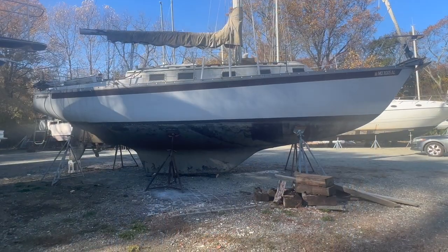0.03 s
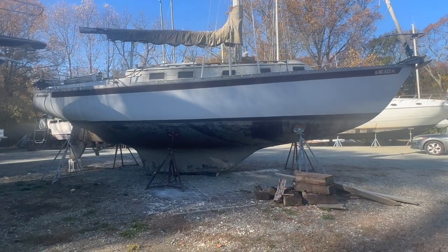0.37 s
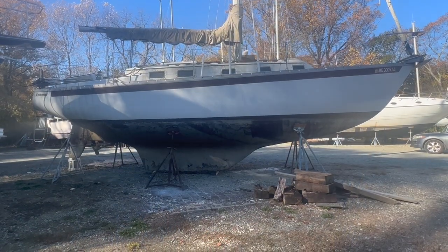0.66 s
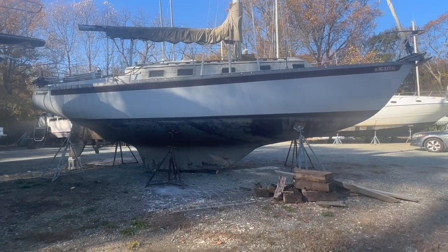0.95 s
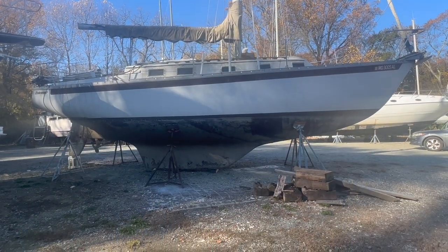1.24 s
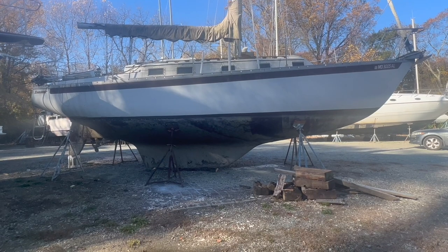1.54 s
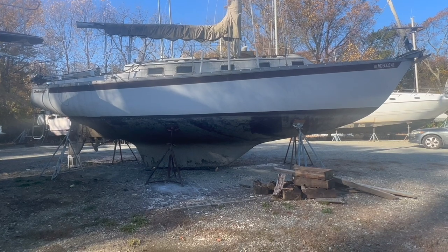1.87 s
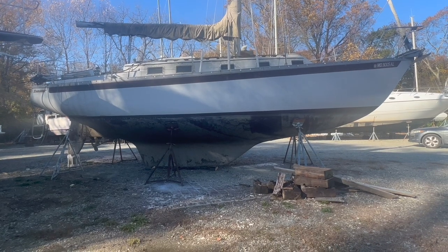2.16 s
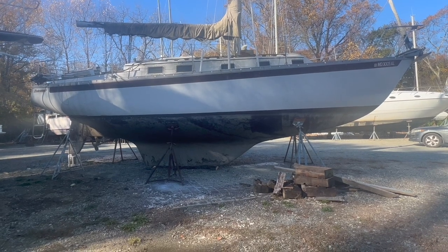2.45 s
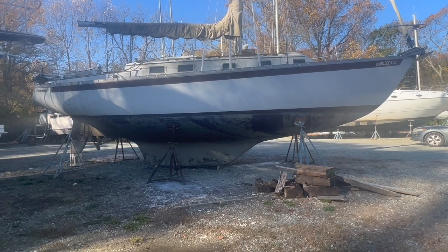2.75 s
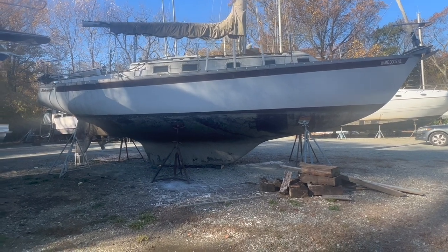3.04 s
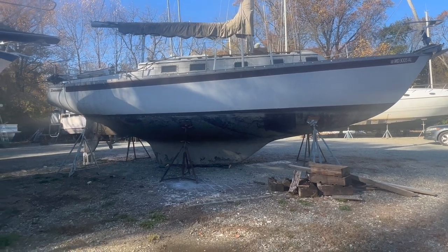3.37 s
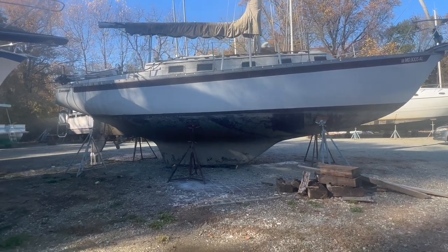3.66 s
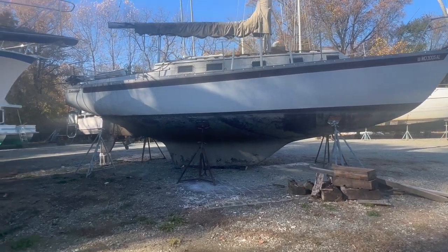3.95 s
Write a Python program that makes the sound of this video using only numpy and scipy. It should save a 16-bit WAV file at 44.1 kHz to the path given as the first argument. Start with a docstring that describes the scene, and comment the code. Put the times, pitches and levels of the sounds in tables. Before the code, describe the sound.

Several small birds call outdoors, first in repeated phrases ending in rising trills, later in three held, wavering whistles. Faint chatter and far gull yelps mix in, echoing lightly, while wind and distant traffic rumble softly at the microphone.

```python
"""Songbirds sing in the trees round a boatyard, each voice a sliding, nearly pure tone.
One repeats a phrase of arched notes and a rising trill, then come level, quivering whistles.
Others slur, peep, rasp and chatter in between, and a far gull yelps four times.
Hulls and trees scatter the calls over a low, steady rumble of wind and distant traffic."""
import sys
import numpy as np
from scipy import signal
from scipy.fft import rfft, irfft
from scipy.io import wavfile
from scipy.ndimage import uniform_filter1d

SR = 44100
rng = np.random.default_rng(int(sys.argv[2]) if len(sys.argv) > 2 else 0)


def log_audio(samples):
    """Write samples as a 16-bit WAV file to the path given in sys.argv[1]."""
    # one column per channel
    frames = np.atleast_2d(samples).T
    # limit to full scale, then quantise
    limited = np.clip(frames, -1, 1)
    pcm = np.round(limited * 32767).astype(np.int16)
    wavfile.write(sys.argv[1], SR, pcm)


N = 176400

PURE_OCTAVE_DB, BRIGHT_OCTAVE_DB = -41.5, -32  # second harmonic against the first


def undb(db):
    """Decibels to linear gain."""
    return 10 ** (np.asarray(db) / 20)


def level(x, db):
    """Set a sound's rms level."""
    return x * undb(db) / np.sqrt(np.mean(x ** 2))


def drift(rate_hz, size):
    """Smooth random wander with a spread near 1."""
    hold = int(SR / rate_hz)
    steps = np.repeat(rng.standard_normal(size // hold + 1), hold)
    return 1.38 * uniform_filter1d(uniform_filter1d(steps, hold), hold)[:size]


def noise(gain):
    """Noise shaped by a function of frequency."""
    hz = np.arange(1, N // 2 + 2) * SR / N
    return irfft(rfft(rng.standard_normal(N)) * gain(hz), N)


def add(out, start, x):
    """Mix a sound in at its start in seconds."""
    i = max(int(start * SR), 0)
    out[i:i + len(x)] += x[:max(N - i, 0)]


def clock(length):
    """Seconds into a note (t), and the share of it gone by (u)."""
    t = np.arange(int(length * SR)) / SR
    return t, t / length


def bend(u, first, middle, last):
    """A pitch curve: the parabola through start, middle and end."""
    return first * (1 - u) * (1 - 2 * u) + middle * 4 * u * (1 - u) + last * u * (2 * u - 1)


def fade(u, edge):
    """Rounded attack and release, each over the share of the note given by edge."""
    return np.sin(np.pi / 2 * np.clip(np.minimum(u, 1 - u) / edge, 0, 1))


def scatter(t60, build_s=0.0057):
    """Dense echoes of unit energy that build up, then die by 60 dB in t60 seconds."""
    t, _ = clock(1)
    envelope = np.exp(-np.log(1000) * t / t60) * np.clip(t / build_s, 0, 1) ** 2
    echoes = rng.standard_normal(len(t)) * envelope
    return echoes / np.sqrt(np.sum(echoes ** 2))


def syrinx(hz, jitter=0.0085, octave_db=PURE_OCTAVE_DB):
    """A bird's voice: a slightly unsteady sine with a faint octave, rms near 1."""
    phase = 2 * np.pi * np.cumsum(hz * (1 + jitter * drift(400, len(hz)))) / SR
    return np.sqrt(2) * (np.sin(phase) + undb(octave_db) * np.sin(2 * phase))


def arch(length, top_hz, drop):
    """A note that swells as it rises and fades as it falls back."""
    _, u = clock(length)
    return fade(u, 0.51) * syrinx(top_hz * (1 - drop * (1 - np.sin(np.pi * u))))


def rumble(hum_hz=118.2, hum_width_hz=20, buffet_hz=25, gust_db=7):
    """The bed: wind and far traffic, a distant motor's hum and slow buffets on the microphone."""
    # Tone of the wind and traffic. Each row: frequency in Hz, relative spectral level in dB.
    air_spectrum = [(30, -2), (150, -4), (250, -9.5), (450, -14.5), (800, -17.5), (1100, -23.5),
                    (1500, -35), (2100, -39), (3300, -33.5), (4600, -46), (6200, -52.5), (14000, -59.5)]
    hz, db = np.array(air_spectrum).T
    air = level(noise(lambda f: undb(np.interp(np.log(f), np.log(hz), db))), -50)
    hum = level(noise(lambda f: 1 / (1 + (2 * (f - hum_hz) / hum_width_hz) ** 2)), -59)
    buffets = noise(lambda f: 1 / (1 + (f / buffet_hz) ** 2))
    gusts = undb(gust_db * drift(1.8, N))
    return air + hum + level(buffets * gusts, -57.5)


def chatter(count=170, centre_hz=3422, spread=0.14):
    """Faint, short chirps at random times, each with its own pitch and bend."""
    out = np.zeros(N)
    starts = rng.uniform(0, N / SR, count)
    for start, (size, pitch, onset, ending) in zip(starts, rng.uniform(-1, 1, (count, 4))):
        _, u = clock(0.026 * np.exp(0.5 * size))
        hz = centre_hz * np.exp(spread * (2 * pitch + bend(u, onset, 0, ending)))
        add(out, start, fade(u, 0.26) * syrinx(hz))
    return level(out, -75.5)


def slurs():
    """Single sliding notes between and under the phrases."""
    # Each row: start and length in seconds, first, middle and last pitch in Hz, level in dB.
    slurred_notes = [(0.07, .014, 4350, 3910, 3550, -66), (0.361, 0.092, 4240, 4130, 3840, -64),
                     (0.375, 0.085, 4050, 3490, 3680, -63), (0.521, 0.05, 4200, 4130, 4300, -67),
                     (0.585, 0.027, 4550, 4800, 4300, -68.5), (0.635, 0.033, 3710, 3480, 4100, -64),
                     (0.672, 0.084, 4400, 3526, 4010, -61.5), (0.824, 0.049, 2596, 3040, 2990, -56),
                     (0.873, 0.04, 3120, 2350, 2060, -66.5), (0.956, 0.105, 3220, 3450, 2910, -57),
                     (1.046, 0.069, 2830, 2554, 2790, -64.5), (1.188, 0.04, 3520, 3514, 2740, -62.5),
                     (1.325, 0.037, 4570, 3790, 3440, -63), (1.502, 0.026, 4310, 3720, 3420, -62.5),
                     (1.506, 0.029, 2554, 2697, 2820, -59), (1.54, 0.156, 3020, 3190, 3150, -63.5),
                     (1.695, 0.046, 3284, 2650, 2110, -69.5), (1.833, 0.034, 3070, 3540, 3410, -61),
                     (2.028, 0.012, 4500, 3640, 3030, -64), (2.086, 0.019, 3250, 3750, 3030, -62.5),
                     (2.112, 0.068, 3840, 3310, 3420, -63.5), (2.27, 0.057, 4200, 3820, 3480, -60.5),
                     (2.303, 0.087, 2150, 1936, 1730, -74.5), (2.415, 0.024, 5000, 6130, 6060, -81),
                     (2.438, .05, 5450, 4980, 4800, -72), (2.895, 0.021, 3750, 4140, 3670, -57),
                     (3.339, .08, 4440, 4490, 4370, -74), (3.196, 0.047, 2450, 2950, 3100, -72),
                     (3.443, 0.11, 2600, 2836, 2950, -66), (3.678, 0.083, 2380, 2800, 3080, -72),
                     (3.712, 0.049, 5240, 4300, 3630, -74.5), (3.762, 0.035, 4135, 3060, 2340, -63),
                     (3.798, 0.039, 2960, 4190, 3200, -66), (3.947, 0.035, 3160, 2670, 1830, -64.5)]
    out = np.zeros(N)
    for start, length, first, middle, last, db in slurred_notes:
        _, u = clock(length)
        add(out, start, undb(db) * fade(u, 0.12) * syrinx(bend(u, first, middle, last)))
    return out


def gull(top_hz=625.5, drop=0.2066):
    """Four far, arched yelps, of which the second and third harmonics carry."""
    out = np.zeros(N)
    _, u = clock(0.097)
    hz = top_hz * (1 - drop * (2 * u - 1) ** 2)
    for start in (0.095, 0.383, 0.711, 1.066):
        yelp = syrinx(2 * hz) + undb(-4.5) * syrinx(3 * hz)
        add(out, start, undb(-69.5) * fade(u, 0.039) * yelp)
    return out


def peeps():
    """Thin, high notes of a smaller bird, trailing off through the trees."""
    out = np.zeros(N)
    for start in (0.156, 1.167, 2.33, 3.515, 3.941):
        add(out, start, undb(-71.5) * arch(length=0.042, top_hz=5487, drop=0.072))
    trail = signal.fftconvolve(out, scatter(t60=0.79))[:N]
    return out + undb(-6) * trail


def phrase_openings():
    """The lead bird opens each phrase with one or two arched notes."""
    # Each row: start and length in seconds, top pitch in Hz, level in dB.
    arched_notes = [(0.17, 0.073, 3332, -55), (0.661, 0.053, 3276, -53), (0.747, 0.043, 3168, -50),
                    (1.332, 0.052, 3184, -52), (1.425, .05, 3180, -52), (2.03, 0.051, 3170, -53.5),
                    (2.123, 0.058, 3057, -52)]
    out = np.zeros(N)
    for start, length, top_hz, db in arched_notes:
        add(out, start, undb(db) * arch(length, top_hz, drop=0.23))
    return out


def trills(first_rate_hz=68.7, last_rate_hz=46.14, depth_hz=181, hoarse_hz=5330):
    """Each phrase ends in a trill that climbs and slows, loudest near the top of each swing."""
    # Each row: start and length in seconds, first, middle and last pitch in Hz, level in dB.
    # The final row is a lower second voice under the last trill.
    trilled_notes = [(0.227, 0.23, 3588, 3810, 3760, -62.5), (0.852, 0.24, 2990, 3717, 3713, -61.5),
                     (1.52, 0.27, 2882, 3590, 3870, -64), (2.225, 0.23, 2565, 3640, 3666, -61.5),
                     (2.239, 0.17, 2938, 3280, 3035, -61.5)]
    out = np.zeros(N)
    for start, length, first, middle, last, db in trilled_notes:
        t, u = clock(length)
        rate = first_rate_hz + (last_rate_hz - first_rate_hz) * u
        rate *= 1 + 0.03 * drift(first_rate_hz, len(t))
        swing = 2 * np.pi * np.cumsum(rate) / SR
        depth = depth_hz * (1 + 0.06 * drift(first_rate_hz, len(t)))
        hz = bend(u, first, middle, last) + depth * np.cos(swing)
        tone = syrinx(hz, octave_db=BRIGHT_OCTAVE_DB)
        hoarse_layer = undb(-22) * syrinx(hoarse_hz + depth_hz * drift(150, len(t)))
        pulse = 1 + 0.33 * np.cos(swing - 0.7)
        add(out, start, undb(db) * fade(u, 0.048) * pulse * (tone + hoarse_layer))
    return out


def rasps(centre_hz=4470, depth_hz=494, rate_hz=95):
    """Short buzzes: a few fast, wide and rough swings of pitch, loudest at the bottom."""
    # Each row: start in seconds, gain in dB.
    rasp_calls = [(0.273, -65), (1.065, -64.5), (1.749, -64), (2.287, -62)]
    out = np.zeros(N)
    t, u = clock(0.042)
    swing = np.cos(2 * np.pi * rate_hz * t)
    envelope = fade(u, 1.0) * (1 - 0.5 * swing)
    for start, db in rasp_calls:
        tone = syrinx(centre_hz + depth_hz * swing, jitter=0.04, octave_db=-20)
        add(out, start, undb(db) * envelope * tone)
    return out


def whistles(head_s=0.0261, edge_s=0.0097, step_hz=121.3, quiver_hz=54.25, depth_hz=80):
    """A strong, clean head, then a step up to a level pitch that quivers as it fades."""
    # Each row: start and length in seconds, held pitch in Hz, opening level in dB.
    whistled_notes = [(1.248, 0.062, 3374, -58), (1.886, 0.039, 3542, -59), (2.814, 0.25, 3533, -54),
                      (3.29, .25, 3506, -52.5), (3.831, 0.4, 3566, -54)]
    head_accent_db, fade_db_per_s = 6, 42.5
    out = np.zeros(N)
    for start, length, pitch, db in whistled_notes:
        t, u = clock(length)
        swing = 2 * np.pi * np.cumsum(quiver_hz * (1 + 0.12 * drift(quiver_hz, len(t)))) / SR
        settled = np.clip(t / head_s - 1, 0, 1)  # 0 in the head, 1 on the held pitch
        quiver = settled * np.sin(swing)
        hz = pitch - step_hz * (1 - settled) + depth_hz * quiver
        gain = undb(db - head_accent_db * settled - fade_db_per_s * t)
        octave_db = PURE_OCTAVE_DB + (BRIGHT_OCTAVE_DB - PURE_OCTAVE_DB) * settled
        tone = syrinx(hz, jitter=0.01, octave_db=octave_db)
        add(out, start, gain * fade(u, edge_s / length) * (1 + 0.5 * quiver) * tone)
    return out


def twitters(wander=0.06):
    """Far, high voices whose pitch darts about at random."""
    # Each row: start and length in seconds, centre pitch in Hz, level in dB.
    twitter_calls = [(2.42, 1.26, 4910, -81.5), (2.682, 0.093, 4300, -73.5), (3.09, 0.064, 5140, -79)]
    out = np.zeros(N)
    for start, length, pitch, db in twitter_calls:
        t, u = clock(length)
        hz = pitch * (1 + wander * drift(150, len(t)))
        add(out, start, undb(db) * fade(u, 0.12) * syrinx(hz))
    return out


def deep_in_trees(calls):
    """Blur: these calls arrive only as scattered sound."""
    return signal.fftconvolve(calls, scatter(t60=0.16))[:N]


def boatyard(calls):
    """The calls, plus quick scatter from the hulls and a longer tail from the trees."""
    hulls = undb(-7.5) * scatter(t60=0.13)
    trees = undb(-6.5) * scatter(t60=0.91)
    return calls + signal.fftconvolve(calls, hulls + trees)[:N]


def scene():
    """All the birds echo round the yard over the rumble, in mono."""
    bed = rumble()
    birds = phrase_openings() + trills() + whistles() + slurs() + peeps() + rasps() + gull()
    hidden_birds = deep_in_trees(chatter() + twitters())
    return (bed + boatyard(birds + hidden_birds))[None]


def record(dry):
    """The recorder cuts the top steeply above 14.5 kHz."""
    return signal.sosfilt(signal.ellip(8, 0.2, 70, 14500, fs=SR, output="sos"), dry)


dry = scene()
out = record(dry)
log_audio(out)
```